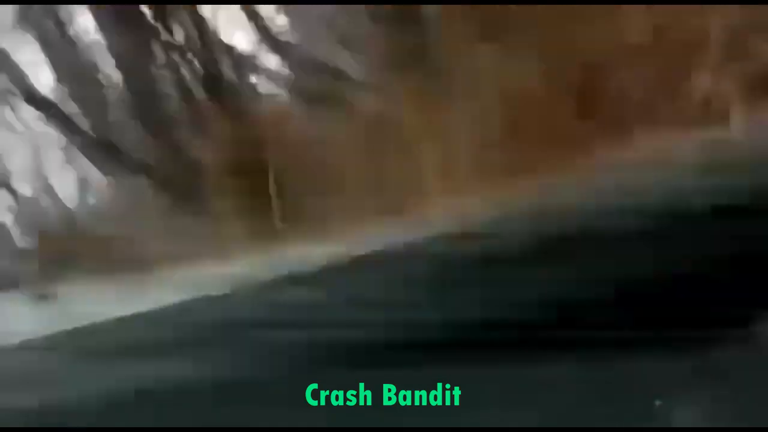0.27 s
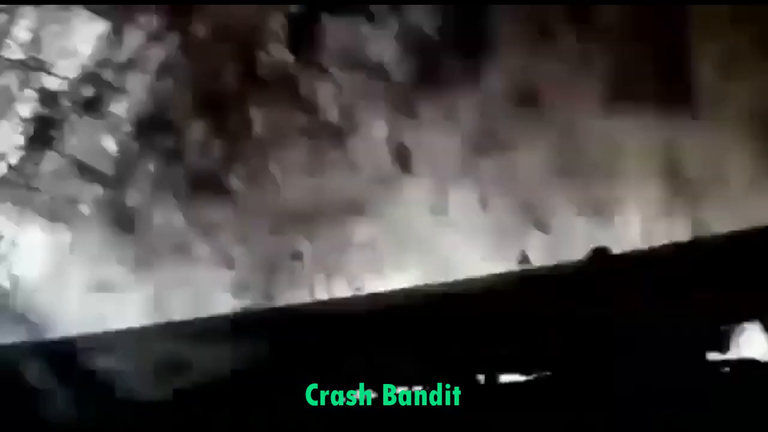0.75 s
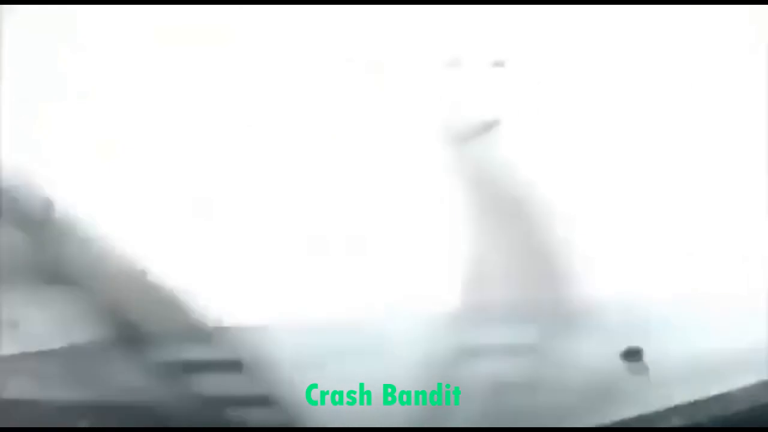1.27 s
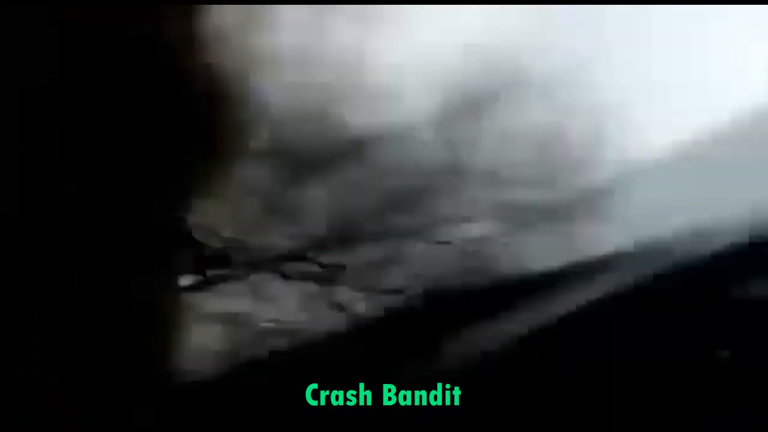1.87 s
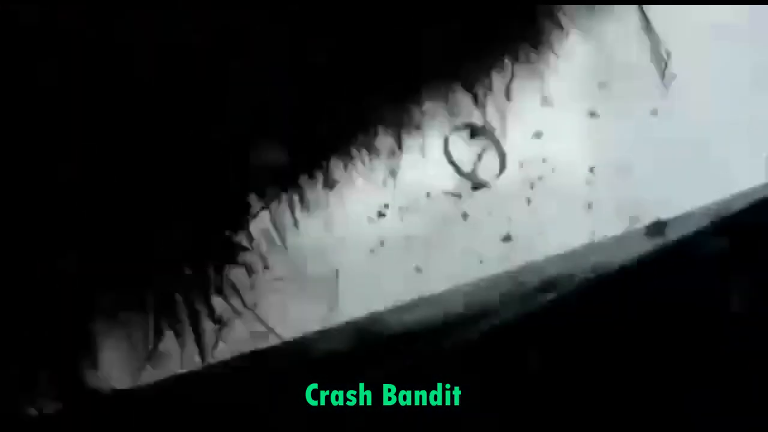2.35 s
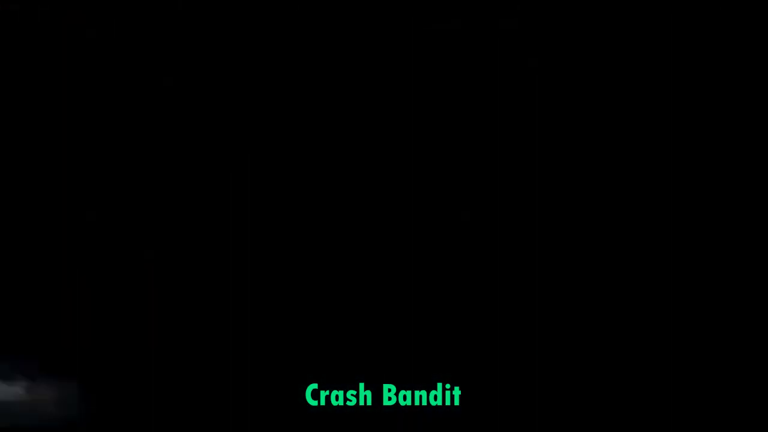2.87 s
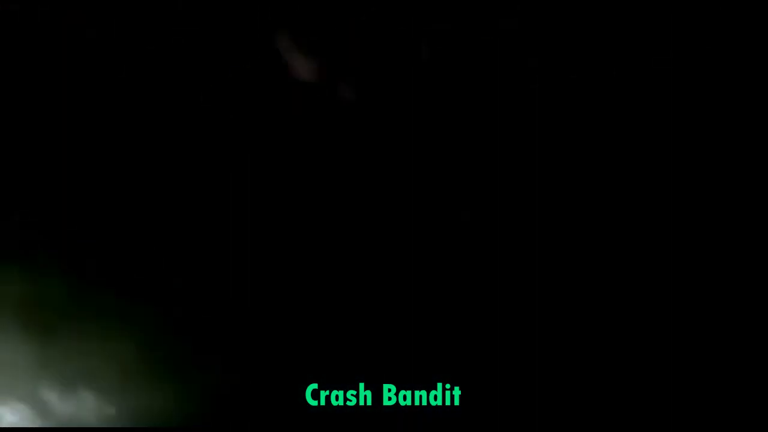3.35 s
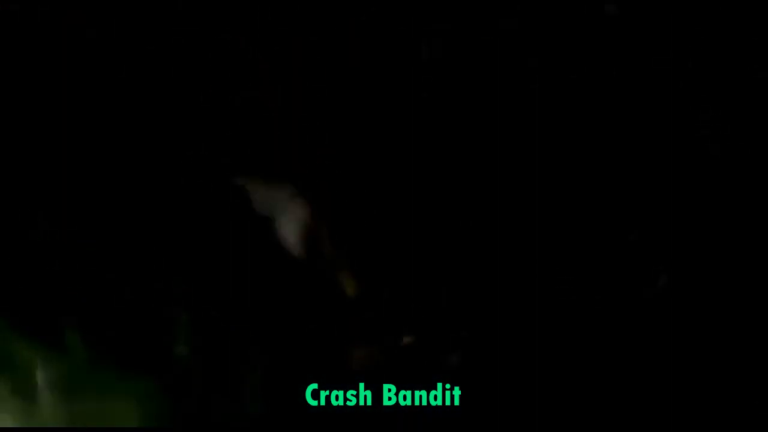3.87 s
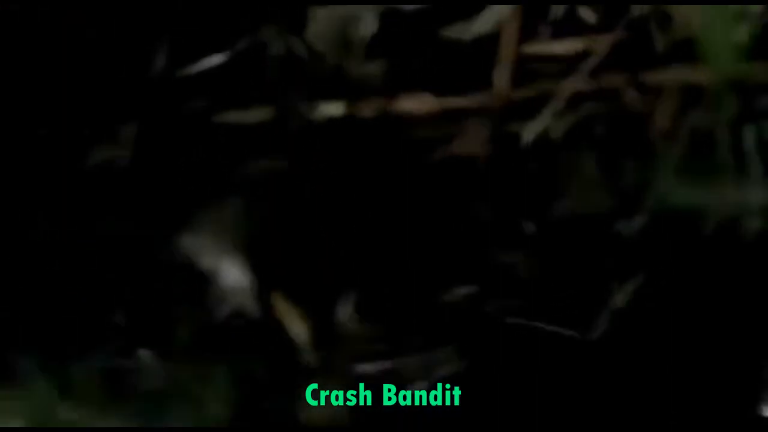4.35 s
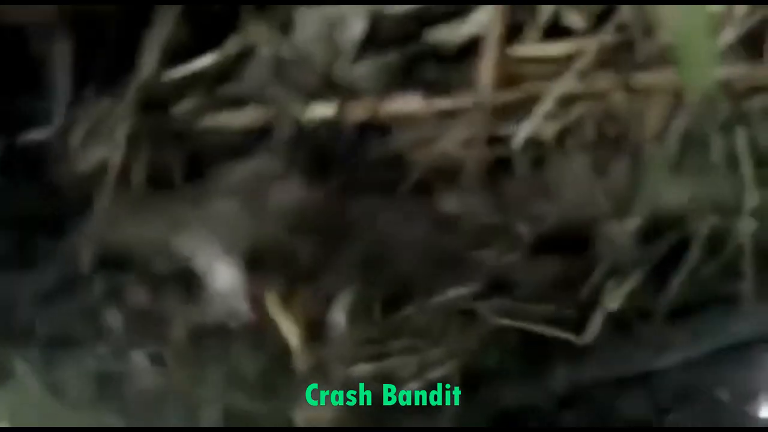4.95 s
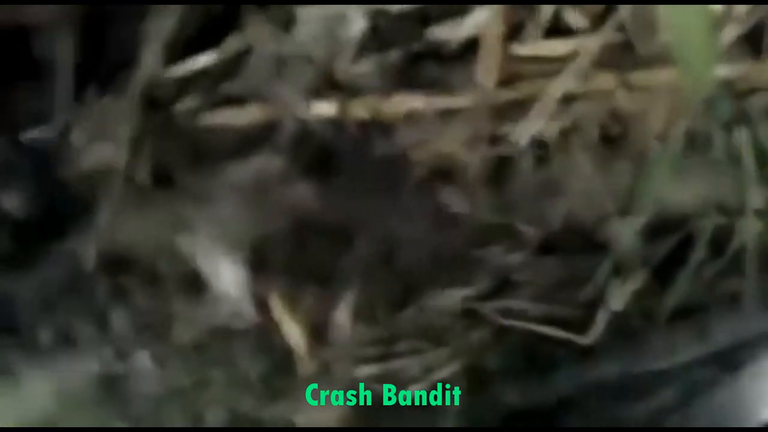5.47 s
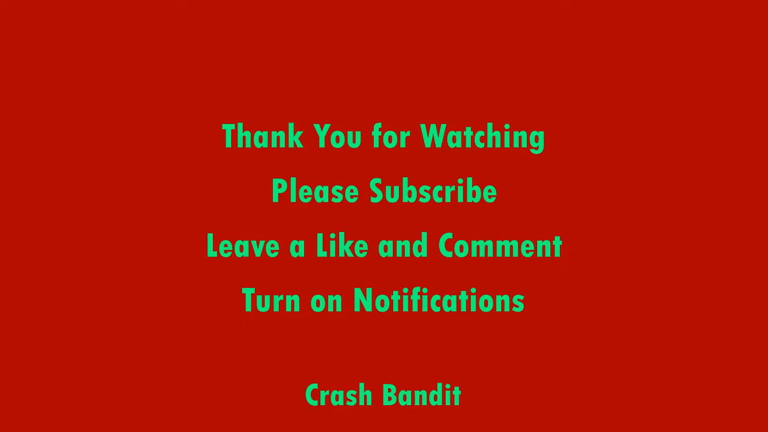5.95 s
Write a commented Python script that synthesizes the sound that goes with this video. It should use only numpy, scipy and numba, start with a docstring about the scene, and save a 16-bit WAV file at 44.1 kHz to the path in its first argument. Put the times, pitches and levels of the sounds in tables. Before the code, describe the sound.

A car ploughs through brush with booming bounces, harsh branch scraping and cracking twigs, then its stranded engine throbs down to a rough, buzzing idle.

```python
"""Car ploughing through brush

Heard through an overloaded microphone in the cabin, a car leaves the road: slowing bounces and noise boom in
its body. Grainy noise makes the brush rake the panels; short bursts and decaying tones make snaps and rings.
Then the stranded engine runs down in heavy throbs, timed by its firing, that ring the body and buzz a panel.
Ducking and clipping flatten the peaks, and the sound is cut off at the end."""
import sys
import numpy as np
from scipy import signal
from scipy.fft import rfft, irfft, next_fast_len
from scipy.io import wavfile
from scipy.ndimage import uniform_filter1d, map_coordinates
from numba import njit

SR = 44100
rng = np.random.default_rng(int(sys.argv[2]) if len(sys.argv) > 2 else 0)


def dump_mix(stems):
    """Bounce the given channels to the path in sys.argv[1] as a 16-bit WAV at rate SR."""
    frames = np.atleast_2d(stems).T  # one column per channel
    limited = np.clip(frames, -1, 1)  # hard clip at full scale
    pcm = np.round(limited * 32767).astype(np.int16)
    wavfile.write(sys.argv[1], SR, pcm)


def gain_from_decibels(decibels):
    """Convert decibel values to linear amplitude factors."""
    exponent = np.asarray(decibels, float) / 20
    return 10 ** exponent


N = 273890
CUT_S = 5.7585  # silence from here on

# how hard the body is shaken while the car moves: (time [s], relative boom level [dB])
BODY_SHAKING = [(0.0, -10.5), (0.1, -20), (0.38, -26), (0.51, -14), (0.78, -24), (1.08, -25.5),
                (1.2, -27.5), (1.7, -29), (1.92, -26), (2.38, -28.5), (2.85, -19.5)]
# how thick the brush is: (time [s], relative scraping level [dB], relative share of fine twigs [dB])
BRUSH_THICKNESS = [(0.0, -44.5, -17), (0.13, -42.5, -20), (0.16, -27, -15), (0.43, -23.5, -14),
                   (0.72, -32.5, -18), (1.0, -30.5, -9.5), (1.2, -27.5, -4), (1.6, -29, -3.5),
                   (2.05, -24, -12.5), (2.15, -30, 7), (2.5, -24, -4), (2.75, -21.5, -7.5), (2.83, -27, 3),
                   (2.88, -31, -13.5), (3.3, -35.5, -10), (3.42, -29, -10), (3.56, -42, -9.5),
                   (3.62, -40.5, 3), (3.71, -29, -2.5), (3.76, -39, -13), (4.28, -39, -11),
                   (5.75, -41, -10.5)]
# the car loses touch with the brush for a moment: (middle [s], depth [dB], length [s])
LOST_TOUCH = [(0.181, 10.5, 0.011), (0.349, 11.5, 0.047), (0.459, 17, 0.026), (0.554, 14.5, 0.039),
              (0.632, 23, 0.018), (0.659, 31, 0.021), (0.767, 15.5, 0.017), (1.031, 26.5, 0.017),
              (1.056, 23, 0.023), (1.803, 10, 0.068), (1.938, 18, 0.011), (2.016, 15, 0.011),
              (2.212, 10, 0.021), (2.291, 5.5, 0.026), (2.541, 8.5, 0.044), (2.632, 6.5, 0.013),
              (2.791, 8, 0.019)]
# a thick branch drags, then lets go: (release [s], level over the brush [dB], swell time [s])
BRANCH_DRAGS = [(0.214, 10, 0.021), (0.49, 7, 0.03), (0.7, 11.5, 0.036), (2.6, 9, 0.019),
                (3.601, 29, 0.0059), (4.625, 2.5, 0.043), (5.21, 5, 0.074), (5.59, 7.5, 0.092)]
# heavy limbs beat the panels: (time [s], drumming level [dB], groan level [dB], time to fall 60 dB [s])
LIMB_BEATS = [(0.154, -17, -23, 0.95), (0.392, -17, -24.5, 0.18), (0.591, -11.5, -17.5, 0.15),
              (0.704, 5.5, -3.5, 0.064), (0.819, -22, -23, 0.98), (1.445, -41, -9.5, 0.38),
              (1.513, -33.5, -13, 0.22), (1.55, -32, -16, 0.14), (1.66, -25, -7, 0.061),
              (1.733, -13, -10, 0.067), (1.815, -25, -22, 0.1), (1.911, -18.5, -15, 0.17),
              (2.739, -24.5, -20, 0.12)]
# snaps and knocks: (time [s], relative snap level [dB], thud level relative to the snap [dB])
SNAPS = [(0.161, -22.5, 3), (0.1983, -6, 1), (0.209, 4.5, 5.5), (0.227, -11.5, 15), (0.284, -35.5, 8),
         (0.304, -23.5, 0), (0.478, -6.5, 13.5), (0.5966, -17, -2), (0.6856, -21, 5), (0.8367, -25.5, 2),
         (0.9171, -15, 5.5), (1.009, -21.5, -4), (1.1581, -27, -5), (1.3038, -16, 2.5), (1.411, -8.5, -8.5),
         (1.498, -18, -8), (1.753, -12.5, -13), (1.818, -15.5, -11), (1.9603, -6, -22.5), (1.992, -5, 8),
         (2.021, -22.5, 12.5), (2.052, -8.5, -17.5), (2.114, 8.5, -39.5), (2.151, 1.5, -18.5),
         (2.2533, -4, -18), (2.276, 4.5, -20), (2.326, 7.5, -22.5), (2.3574, -10, -25), (2.378, -9, -10),
         (2.4, 15, -18), (2.415, -1, -20), (2.4648, -7.5, -18), (2.493, -1.5, -23.5), (2.5558, -5.5, -23),
         (2.5777, 4.5, -20), (2.6527, 9.5, -29.5), (2.667, 13.5, -22), (2.6882, 9, -6.5), (2.7167, 3, -14),
         (2.761, 4, -19), (2.808, -5, -19.5), (2.8273, -12.5, -20.5), (2.867, -19, 15), (3.2653, -10.5, 0),
         (3.327, -0.5, -12), (3.418, -7.5, -9.5), (3.4617, -11, -2.5), (3.496, -16, -9),
         (3.6014, -8.5, -23), (3.734, -15.5, 9.5), (3.7604, -18.5, 2), (3.8547, -21, -1),
         (4.1075, -14.5, 7), (4.306, -23.5, 18), (4.409, -13.5, 16), (4.452, -24.5, 29), (4.575, -19, 17.5),
         (4.6916, -15, 16), (4.818, -32, 11), (5.011, -21, 19.5), (5.159, -23, 25), (5.488, -13, 13)]
# squeaking trim, struck panels and small hard pieces; a half-second fade shortens the decay further:
# (time [s], middle pitch [Hz], relative level [dB], time to fall 60 dB [s])
RING_NOTES = [(0.086, 973, -21, 0.11), (0.086, 1603, -29, 0.53), (.088, 2080, -25.5, 0.27),
              (.128, 726, -20.5, 0.16), (0.129, 1645, -22.5, 0.2), (0.154, 2130, -16.5, 0.1),
              (1.751, 9660, -32.5, 1.1), (2.6, 12230, -31, 1.3), (2.72, 12230, -30, 0.56),
              (1.447, 510.5, -10, 0.26), (1.449, 680, -13, 0.28), (1.51, 335, -9, 0.13),
              (1.81, 284, -14.5, 0.074), (1.905, 306, -13, .12), (2.321, 1700, -16, 0.042),
              (2.355, 1700, -21.5, .05), (2.38, 2590, -11.5, .05)]
# how hard the engine works: (time [s], relative rocking level [dB], relative panel buzz level [dB])
ENGINE_EFFORT = [(2.82, -20, -25.5), (2.97, -14.5, -28.5), (3.07, -11, -25.5), (3.36, -11.5, -21),
                 (3.55, -15, -29), (3.64, -20, -68), (3.73, -6, -12), (4.0, -17.5, -31),
                 (4.15, -10.5, -30.5), (4.45, -24, -26), (4.54, -10, -43), (4.61, -15, -25),
                 (4.8, -16.5, -23.5), (5.19, -13, -25), (5.25, -13, -37), (5.45, -12.5, -34.5),
                 (5.57, -12.5, -26), (5.75, -14, -33.5)]
# firing rate, kicked up and sliding back to an unsteady idle: (time [s], rate [Hz])
FIRING_RATE = [(2.82, 55), (2.9, 52), (2.96, 47.5), (3.05, 43.58), (3.3, 34.07), (3.5, 30.65), (3.6, 24.45),
               (3.7, 27.61), (3.76, 34.39), (3.9, 29.11), (4.05, 27.8), (4.2, 24.84), (4.33, 22.32),
               (4.5, 17.9), (4.63, 23.26), (4.8, 23.73), (4.98, 19.11), (5.15, 20.96), (5.3, 22.14),
               (5.45, 20.77), (5.76, 21.58)]
# resonances of the cabin shell: (middle [Hz], width [Hz], level [dB])
SHELL_MODES = [(47.6, 5.3, 0), (86.7, 28.7, -1), (131.4, 18, 2.5), (164.5, 27.5, -1)]
# resonances of hollow door and floor panels: (middle [Hz], width [Hz], level [dB])
PANEL_MODES = [(315.7, 68.5, -4), (464, 248, -6), (662, 226, -8), (873, 110, -11.5)]
# resonances of the dashboard trim: (middle [Hz], width [Hz], level [dB])
TRIM_MODES = [(725, 346, 3), (1100, 160, 1.5), (1660, 247, 11), (2020, 630, 10), (2740, 140, 7)]
# resonance of the loose panel: (middle [Hz], width [Hz], level [dB])
LOOSE_PANEL_MODES = [(491.2, 17.4, 0)]
# tone colour of drumming panels: (frequency [Hz], relative level [dB])
DRUM_COLOUR = [(47, -53.5), (80, 8), (129, 3.5), (248, -2.5), (320, -6.5), (420, -25), (700, -120)]
# tone colour of scraping branches: (frequency [Hz], relative level [dB])
SCRAPE_COLOUR = [(530, -11.5), (900, 10), (1080, 9), (1200, 3), (1660, 7.5), (2580, 8), (3750, -13),
                 (5000, -47), (6500, -39), (11000, -120)]
# tone colour of fine twigs: (frequency [Hz], relative level [dB])
TWIG_COLOUR = [(2470, -8), (4200, -20.5), (5250, -9), (6400, -11.5), (7140, -10.5), (7920, -1), (8880, -2),
               (10900, -19), (14000, -19.5), (14800, -28.5), (15500, -39)]

# the bounce rate sinks from first to last with this time constant
BOUNCE_FIRST_HZ, BOUNCE_LAST_HZ, BOUNCE_SLOWS_S = 49.94, 18.5, .45
USUAL_SCRAPE_DB = -24  # scraping curve value at which the panels have the levels below
# panel levels, and dB gained per dB of scraping
DRUM_DB, DRUM_FOLLOWS, GROAN_DB, GROAN_FOLLOWS = -21.5, 0.2, -26, 0.67
# twigs whipping the glass and trim: octaves to either side, cycles to fall to 37 %, level over the scraping
WHIPS_PER_S, WHIP_HZ, WHIP_OCTAVES, WHIP_CYCLES, WHIP_DB = 200, 1700, 1.36, 4, -5
SNAP_T60_S = 0.024  # time for the burst to fall 60 dB
CRACK_DB, CRACK_T60_S = 1.5, 0.0042  # the first instant of a snap, over the longer burst
SNAP_COLOUR_DB = 6  # each snap favours other resonances, by up to this much either way
IDLE_HZ, FIRST_TURN = 21.38, -.09
SWING_LEADS = 0.466  # turns by which the swing comes earlier near stalling
BUZZ_TURN, BUZZ_TURN_PER_HZ = 1.03, .008  # point of the swing where the panel buzzes; earlier at speed
BUZZ_SLIPS = .42  # at high speed the buzz moves this many turns earlier, to the down-stroke
BUZZ_SWELL_DB, BUZZ_DROPS = 11, 0.08  # swell per turn away from stalling; drops this many turns past its point
TICK_DB = -19.5  # ticks of the trim, relative to the buzz
SHUDDER_DB, SHUDDER_DB_PER_HZ = -12.5, .95  # level at idle, and dB gained per Hz of slowing
RING_DB, RING_RACING_DB, RING_STALLING_DB = -30, 12.5, 13  # ring of the shell; extra when racing or stalling
RACING_FROM_HZ, RACING_FULL_HZ = 42, 48  # firing rates between which racing sets in


def unit(x):
    """Scales to an rms of 1."""
    return x / np.sqrt(np.mean(x ** 2) + 1e-20)


def noise():
    """White noise as long as the scene."""
    return rng.standard_normal(N)


def curves(rows):
    """Draws straight lines between table rows, one curve for each column after the time."""
    s, *cols = np.transpose(rows)
    return [np.interp(np.arange(N) / SR, s, c) for c in cols]


def wobble(rate):
    """A smooth random curve with rate random points a second, rms 1."""
    return unit(map_coordinates(rng.standard_normal(int(N * rate / SR) + 4), [np.arange(N) * rate / SR]))


def filtered(x, response):
    """Multiplies the spectrum of x by a complex response of frequency."""
    m = next_fast_len(N + SR // 2)
    return irfft(rfft(x, m) * response(np.fft.rfftfreq(m, 1 / SR)), m)[:N]


def coloured(x, spectrum):
    """Shapes x by (frequency [Hz], level [dB]) points, rms 1."""
    f, db = np.transpose(spectrum)
    return unit(filtered(x, lambda hz: gain_from_decibels(np.interp(np.log(hz + 1), np.log(f + 1), db))))


def resonant(x, modes):
    """Rings x through resonances, with the sign turned for every second one."""
    def response(f):
        total = 0
        for k, (middle, width, db) in enumerate(modes):
            peak = 1j * f * width / (middle * middle - f * f + 1j * f * width)
            total = total + (-1) ** k * gain_from_decibels(db) * peak
        return total
    return filtered(x, response)


def brush_levels():
    """Scraping level, twig share and drags: a drag swells up to its release, lost touch is a steep dip."""
    scrape_db, twig_db = curves(BRUSH_THICKNESS)
    t = np.arange(N) / SR
    drags_db = sum(db * np.exp(np.minimum(t - s, 0) / swell) * (t < s) for s, db, swell in BRANCH_DRAGS)
    lulls_db = sum(db * np.exp(-(2 * (t - s) / length) ** 4) for s, db, length in LOST_TOUCH)
    return scrape_db - lulls_db, twig_db, drags_db


def shell():
    """The body bounces ever slower on its springs and booms, with irregular low lurches."""
    boom_db, = curves(BODY_SHAKING)
    t = np.arange(N) / SR
    bounce_hz = BOUNCE_LAST_HZ + (BOUNCE_FIRST_HZ - BOUNCE_LAST_HZ) * np.exp(-t / BOUNCE_SLOWS_S)
    bounce = np.sin(2 * np.pi * np.cumsum(bounce_hz * (1 + 0.095 * wobble(12.17))) / SR)
    boom = unit(resonant(noise(), SHELL_MODES[:1]))
    lurch = coloured(noise(), [(4, -37.0), (12, 8.0), (40, 0.5), (100, -8.5), (160, -115.5)])
    return gain_from_decibels(boom_db + 6.5) * (1.17 * bounce + 0.68 * boom + 0.99 * lurch)


def panels():
    """Hollow panels drum and groan along with the scraping, and more as heavy limbs beat them."""
    t = np.arange(N) / SR
    touch_db = brush_levels()[0] - USUAL_SCRAPE_DB
    drum_gain = gain_from_decibels(DRUM_DB + DRUM_FOLLOWS * touch_db)
    groan_gain = gain_from_decibels(GROAN_DB + GROAN_FOLLOWS * touch_db)
    for s, drum_db, groan_db, t60 in LIMB_BEATS:
        onset = np.clip((t - s) / 0.0081, 0, 1)
        dying = gain_from_decibels(-60 * np.abs(t - s) / t60) * onset
        drum_gain = drum_gain + gain_from_decibels(drum_db) * dying
        groan_gain = groan_gain + gain_from_decibels(groan_db) * dying
    drum = gain_from_decibels(4.06 * wobble(25.27)) * coloured(noise(), DRUM_COLOUR)
    groan = gain_from_decibels(2.1 * wobble(30.14) + 2.5 * wobble(90)) * resonant(noise(), PANEL_MODES)
    return drum_gain * unit(drum) + groan_gain * unit(groan)


def body():
    """Shell and panels sound only while the car moves."""
    moving = np.arange(N) / SR < BODY_SHAKING[-1][0]
    return moving * (shell() + panels())


def whips():
    """Twigs whip glass and trim: short dying tones, each with its own pitch and size, rms 1."""
    when, size, pitch = rng.random((round(WHIPS_PER_S * N / SR), 3)).T
    hz = (WHIP_HZ * 2 ** (WHIP_OCTAVES * (2 * pitch - 1)))[:, None]
    t = np.arange(700) / SR
    loudness = gain_from_decibels(-3 * np.log(size + .02))[:, None]  # few are loud
    envelope = np.exp(-hz * t / WHIP_CYCLES) * (1 - np.exp(-t / .001))
    tones = loudness * np.sin(2 * np.pi * hz * t) * envelope
    at = (when * N).astype(int)[:, None] + np.arange(len(t))
    return unit(np.bincount(at.ravel(), tones.ravel(), N + len(t))[:N])


def brush():
    """Branches rake the panels in short bunches; each bunch is a hiss full of tiny snaps."""
    scrape_db, twig_db, drags_db = brush_levels()
    # a twig bends with growing noise, then lets go at once: a decay running backwards in time
    releases = (rng.random(N) < 75 / SR) * rng.exponential(size=N)
    bending = unit(filtered(releases, lambda hz: 1 / (1 - 1j * hz / 24)))
    bunches = (1.2 + bending) * gain_from_decibels(1.29 * wobble(160))
    grains = rng.standard_normal((2, N)) * gain_from_decibels(2.7 * rng.exponential(size=(2, N)))
    scrape = unit(bunches * gain_from_decibels(0.29 * wobble(54)) * coloured(grains[0], SCRAPE_COLOUR))
    twigs = unit(bunches * gain_from_decibels(0.66 * wobble(60)) * coloured(grains[0] + grains[1], TWIG_COLOUR))
    mix = scrape + gain_from_decibels(twig_db + 4.0) * twigs + gain_from_decibels(WHIP_DB) * whips()
    return gain_from_decibels(scrape_db + drags_db + 1.0) * mix


def rings():
    """Trim squeaks, struck panels and small hard pieces ring as dying tones with a wavering phase."""
    out = np.zeros(N + SR)
    t = np.arange(SR // 2) / SR
    waver = np.pad(wobble(150), (0, SR))
    for s, hz, db, t60 in RING_NOTES:
        start = round(s * SR)
        depth = min(hz / 1500, 1.2)  # high notes waver more
        tone = np.sin(2 * np.pi * hz * t + depth * waver[start:][:len(t)])
        out[start:][:len(t)] += gain_from_decibels(db - 60 * t / t60) * tone * (1 - t / t[-1])
    return out[:N] * gain_from_decibels(2.5 * wobble(66))


def snaps():
    """A snap is a crack and a dying noise burst that rings the trim, with a thud in the panels."""
    cracks = np.zeros((len(TRIM_MODES) + 1, N + SR))  # one per trim resonance, the last for the treble
    thuds = np.zeros(N + SR)
    t = np.arange(SR // 2) / SR
    for s, db, thud_db in SNAPS:
        start = round(s * SR)
        envelope = gain_from_decibels(-60 * t / SNAP_T60_S) + gain_from_decibels(CRACK_DB - 60 * t / CRACK_T60_S)
        burst = envelope * rng.standard_normal(len(t))
        colour_db = SNAP_COLOUR_DB * rng.uniform(-1, 1, (len(cracks), 1))
        cracks[:, start:][:, :len(t)] += gain_from_decibels(db + colour_db) * burst
        thuds[start:][:len(t)] += gain_from_decibels(db + thud_db + 9.5) * burst
    trim = sum(resonant(crack[:N], [mode]) for crack, mode in zip(cracks, TRIM_MODES))
    bright = resonant(cracks[-1, :N], [(7460, 900, -7.0)])
    return gain_from_decibels(-11.0) * trim + bright + resonant(thuds[:N], PANEL_MODES)


def softened(blows):
    """Rubber mounts soften each blow by taking off its treble."""
    return filtered(blows, lambda hz: 1 / (1 + 1j * hz / 450) ** 3)


def loose_panel(turns, size, rate_hz, stalling):
    """A loose panel touches at one point of the engine's swing: it slaps and buzzes, and the trim ticks."""
    slip = BUZZ_SLIPS * np.clip((rate_hz - 35) / 4, 0, 1)
    buzz_turn = BUZZ_TURN - BUZZ_TURN_PER_HZ * (rate_hz - IDLE_HZ) - slip
    past = turns - buzz_turn
    slaps = softened(np.diff(np.floor(past + 0.081), prepend=0) * size)
    ticks = unit(resonant(np.diff(np.floor(past + 0.0801), prepend=0) * size, TRIM_MODES))
    angle = 2 * np.pi * past
    rebound = 0.78 * np.clip((rate_hz - 30) / 6, 0, 1)  # at speed it also touches on the way back
    touch = np.exp((0.64 + 0.16 * stalling - rebound) * np.cos(angle) + rebound * np.cos(2 * angle))
    swell = gain_from_decibels(BUZZ_SWELL_DB * (1 - 0.37 * stalling) * ((past - BUZZ_DROPS) % 1))
    contact = unit(touch * swell) * size
    buzz = 0.34 * gain_from_decibels(3.0 * wobble(35)) * unit(resonant(slaps, PANEL_MODES[1:2]))
    buzz = buzz + (0.83 + 0.32 * stalling) * unit(resonant(noise(), PANEL_MODES[:3]))
    buzz = buzz + 0.7 * (1 - stalling) * unit(resonant(noise(), LOOSE_PANEL_MODES))
    return contact * buzz + gain_from_decibels(TICK_DB) * ticks


def shell_ring(turns, size, rate_hz, stalling):
    """Each firing strikes the shell, which rings more when the engine races or nearly stalls."""
    firings = softened(np.diff(np.floor(turns + 0.1336), prepend=0) * size)
    racing_db = np.interp(rate_hz, (RACING_FROM_HZ, RACING_FULL_HZ), (0, RING_RACING_DB))
    level_db = RING_DB + racing_db + RING_STALLING_DB * stalling + 2.8 * wobble(16)
    return gain_from_decibels(level_db) * unit(resonant(firings, SHELL_MODES[1:]))


def shudder(rate_hz):
    """The whole car shudders as low noise, louder the slower the engine fires."""
    rumble = coloured(noise(), [(10, -30.5), (25, -8.0), (60, 7.5), (140, -6.5), (350, -19.0),
                                (700, -27.5), (1500, -63.0)])
    return gain_from_decibels(SHUDDER_DB - SHUDDER_DB_PER_HZ * (rate_hz - IDLE_HZ)) * rumble


def engine():
    """The block rocks once per firing, which rings the shell and makes the loose panel buzz."""
    rock_db, buzz_db = curves(ENGINE_EFFORT)
    rate_hz, = curves(FIRING_RATE)
    running = np.arange(N) / SR > FIRING_RATE[0][0]
    stalling = np.clip((27 - rate_hz) / 5, 0, 1)  # slow firing comes unevenly
    turns = np.cumsum(rate_hz * running) / SR + FIRST_TURN + (.015 + .025 * stalling) * wobble(14)
    size = gain_from_decibels((1.5 + 2.8 * stalling) * wobble(25))
    swing = np.cos(2 * np.pi * (turns - .03 + SWING_LEADS * stalling))
    rock = .15 * swing + 1.5 * swing ** 7  # stiffening mounts sharpen the swing into two jolts
    throbs = gain_from_decibels(rock_db) * rock + shell_ring(turns, size, rate_hz, stalling)
    buzz = gain_from_decibels(buzz_db) * loose_panel(turns, size, rate_hz, stalling)
    return running * (throbs + buzz + shudder(rate_hz))


def scene():
    """Everything reaches one microphone behind the windscreen."""
    return (body() + brush() + rings() + snaps() + engine())[None]


@njit
def held_level(level, top, release):
    """Follows a level above top at once and creeps back by the factor release each sample."""
    out, held = np.empty_like(level), top
    for i in range(len(level)):
        held = max(level[i], top + (held - top) * release)
        out[i] = held
    return out


def roll_off(x):
    """The treble ends steeply here."""
    return signal.sosfilt(signal.butter(12, 15820, fs=SR, output="sos"), x)


def record(dry):
    """A fast limiter ducks loud swings, the rest is clipped, and a coupling capacitor tilts the flat tops."""
    level = uniform_filter1d(np.abs(dry[0]), size=80)
    ducked = dry[0] * 0.28 / held_level(level, 0.32, np.exp(-1 / (0.017 * SR)))
    clipped = ducked / (1 + np.abs(ducked / 0.23) ** 6) ** (1 / 6)
    # the capacitor takes off the deepest bass; a steep filter ends the treble at 14.6 kHz
    tilted = filtered(clipped, lambda hz: 1j * hz / (5 + 1j * hz) / (1 + (hz / 14600) ** 30))
    mix = tilted * (np.arange(N) < CUT_S * SR)
    return roll_off(mix[None])


dry = scene()
out = record(dry)
dump_mix(out)
```